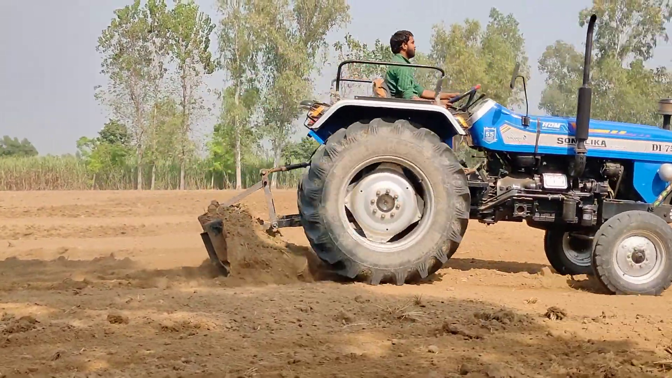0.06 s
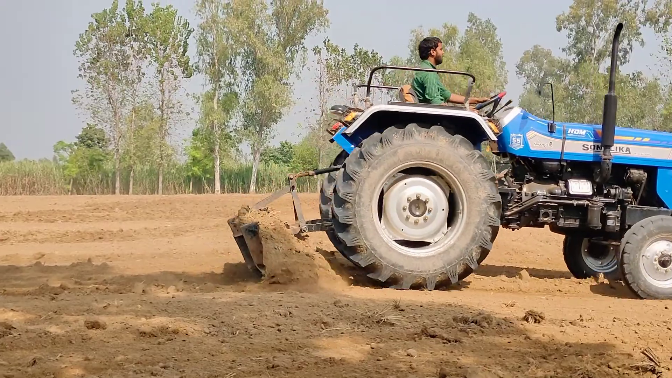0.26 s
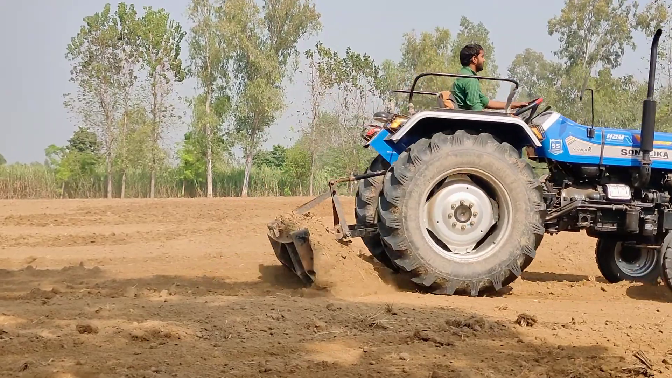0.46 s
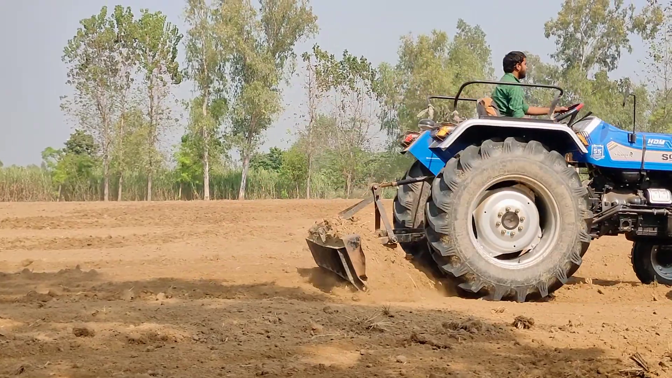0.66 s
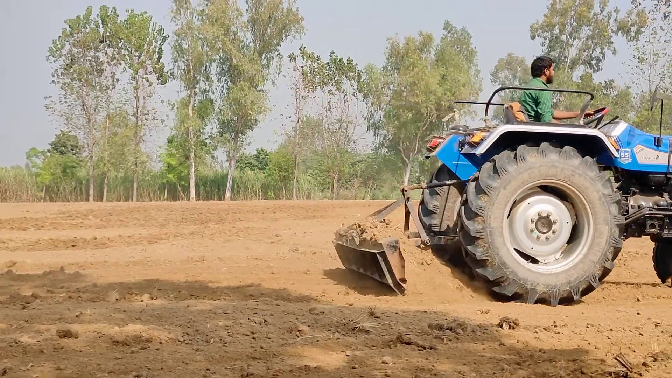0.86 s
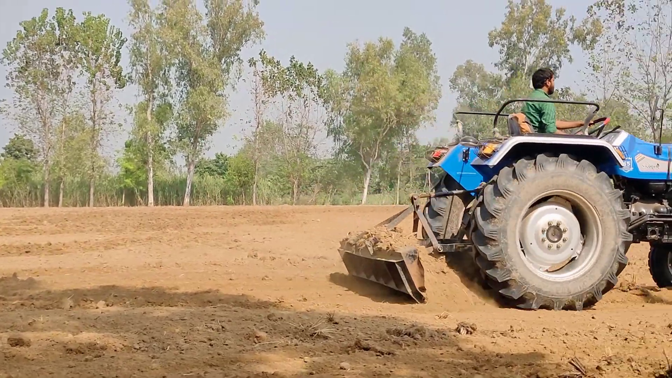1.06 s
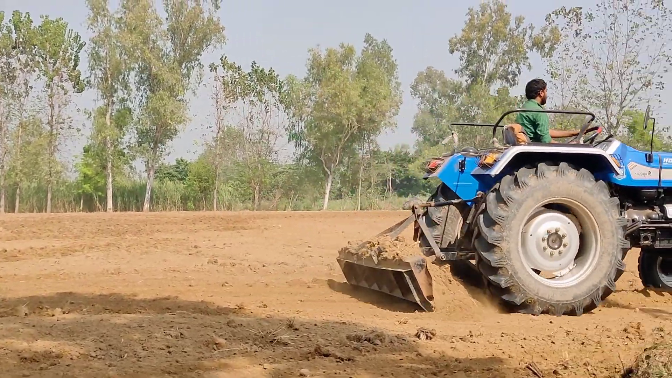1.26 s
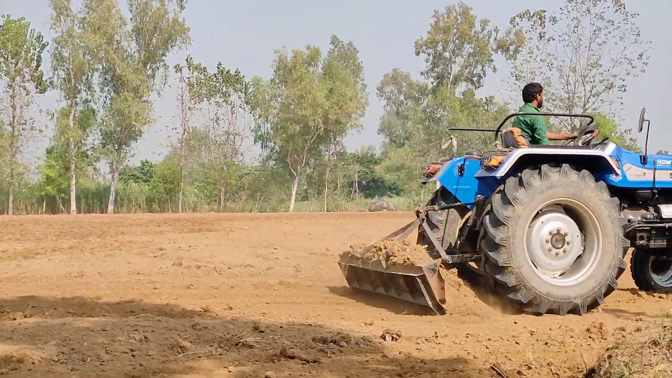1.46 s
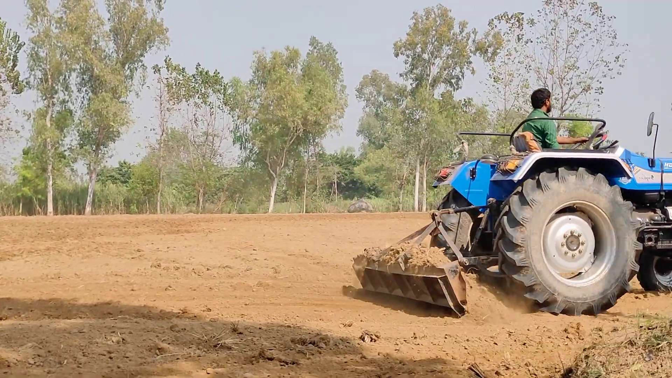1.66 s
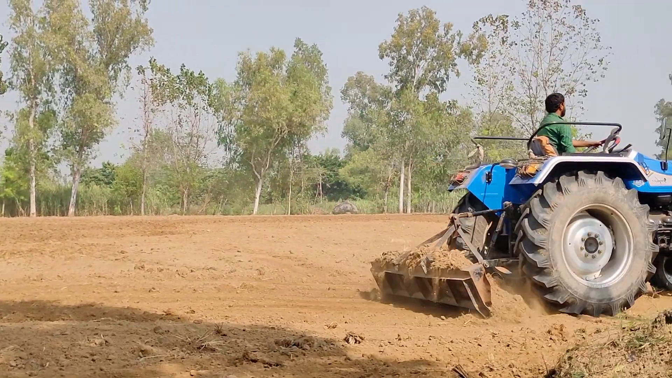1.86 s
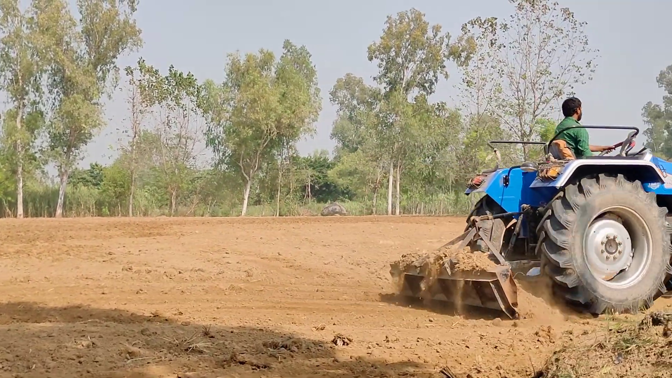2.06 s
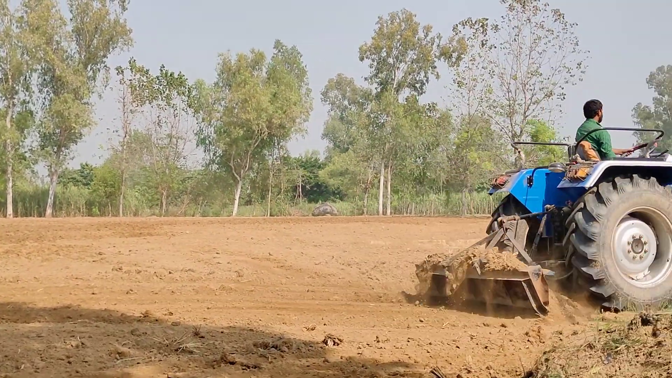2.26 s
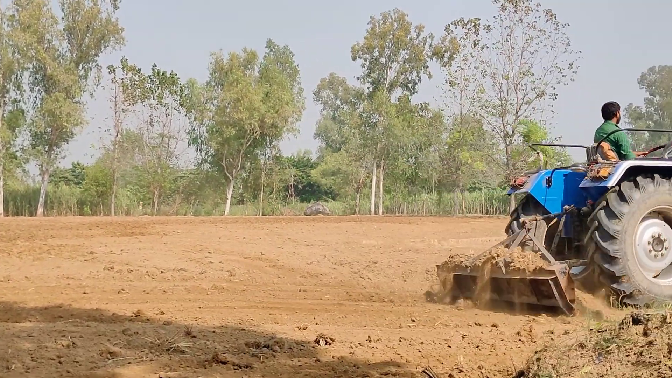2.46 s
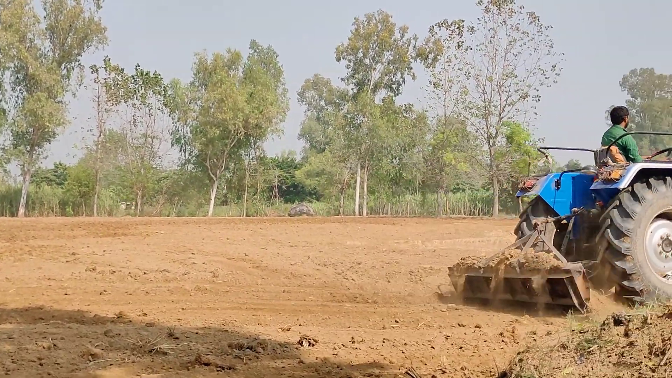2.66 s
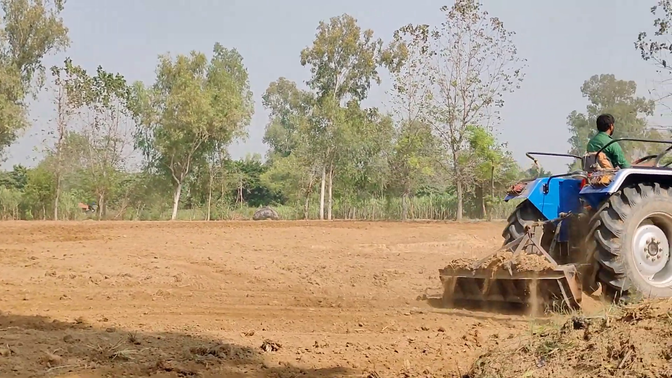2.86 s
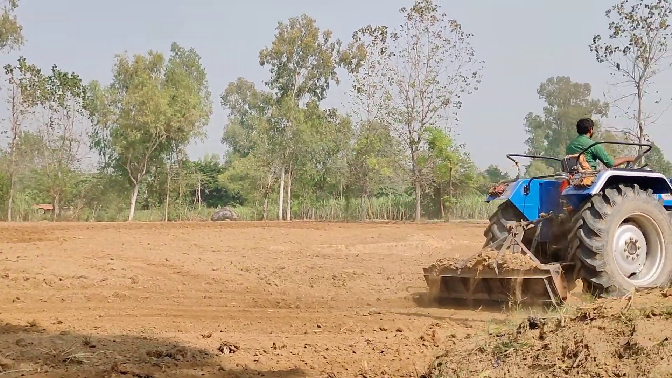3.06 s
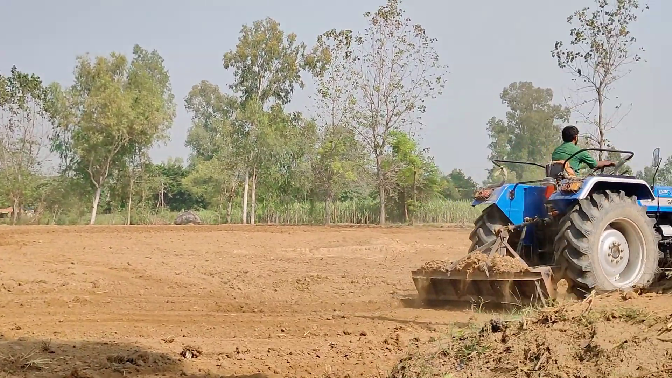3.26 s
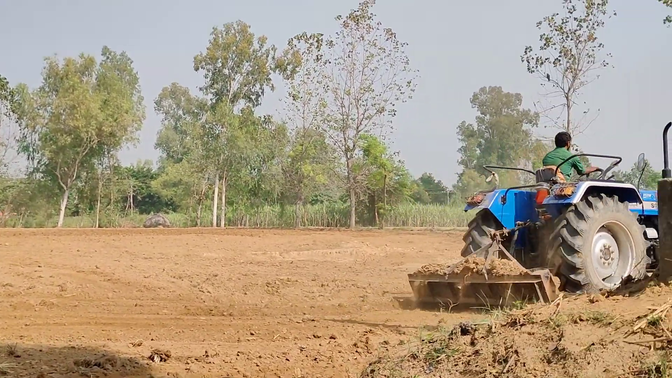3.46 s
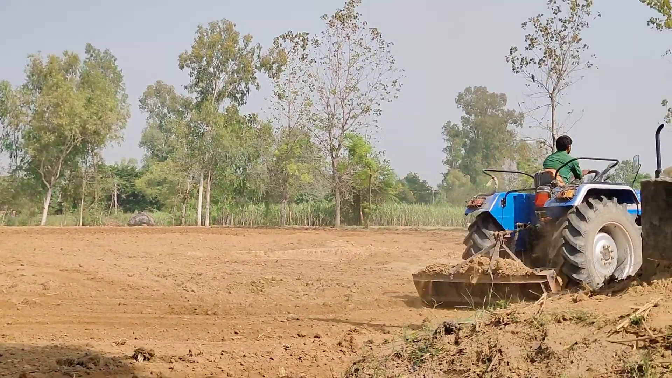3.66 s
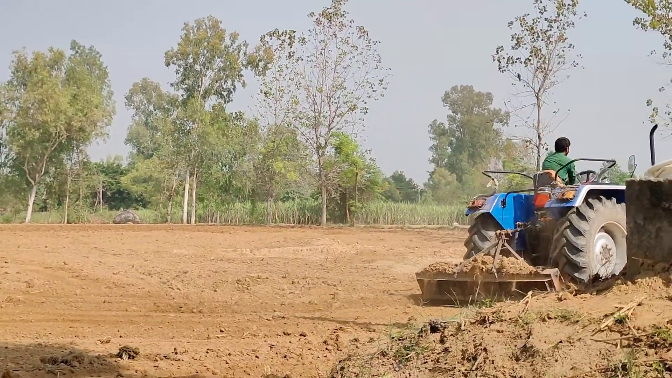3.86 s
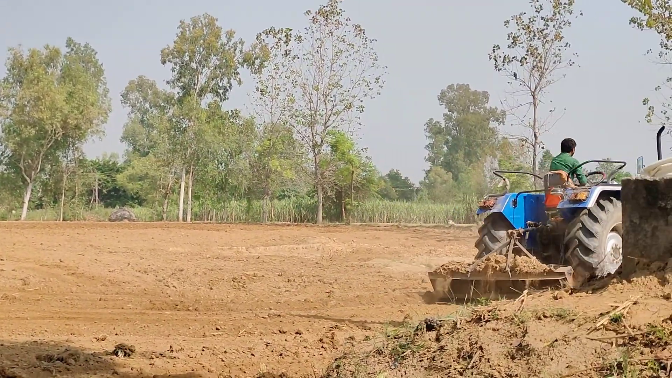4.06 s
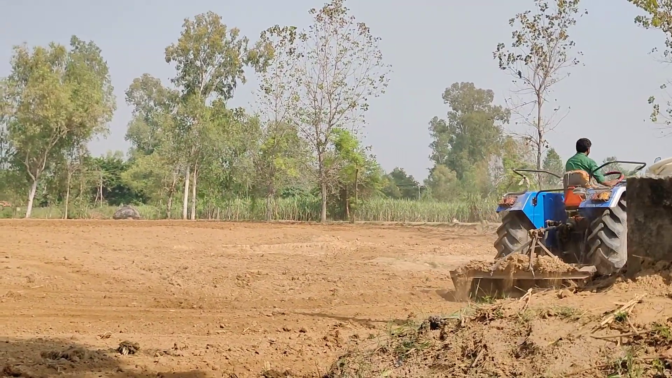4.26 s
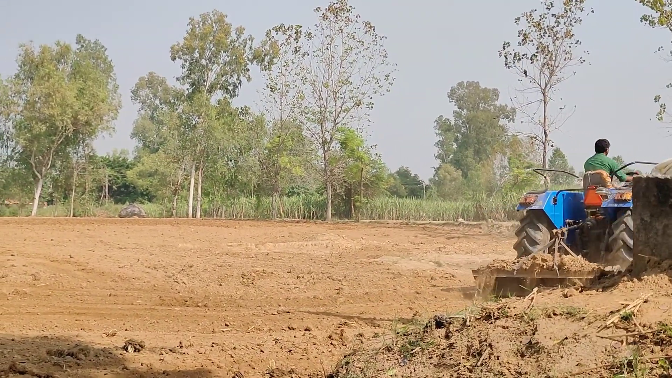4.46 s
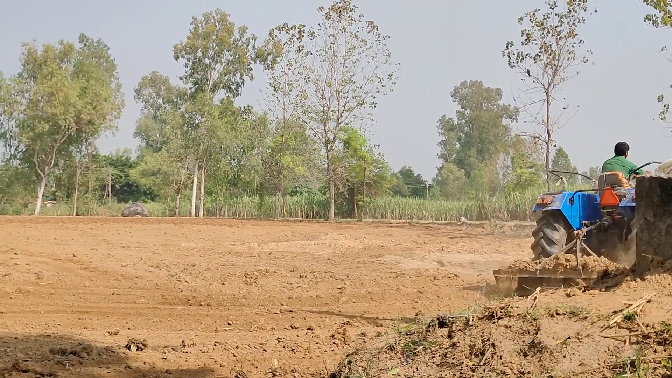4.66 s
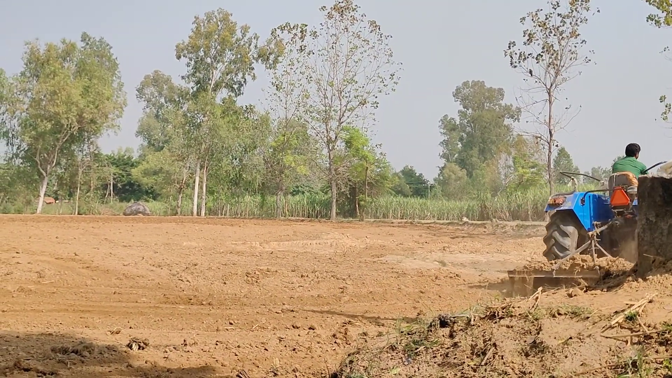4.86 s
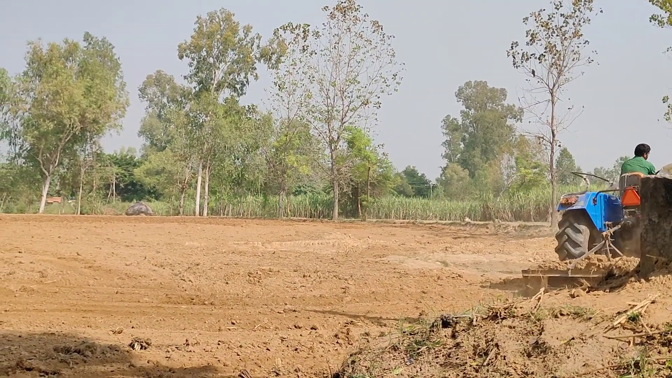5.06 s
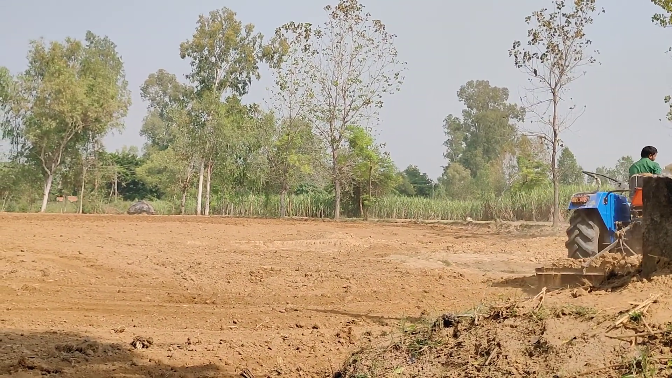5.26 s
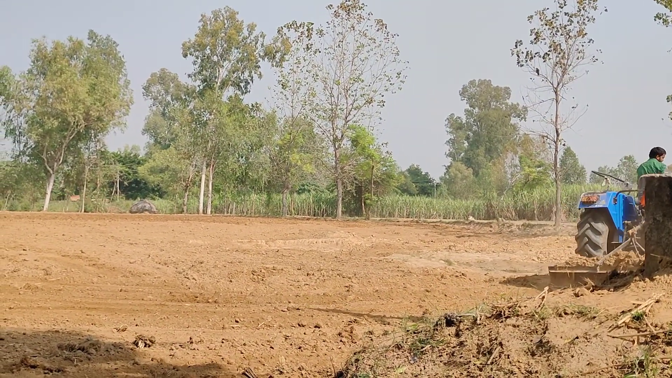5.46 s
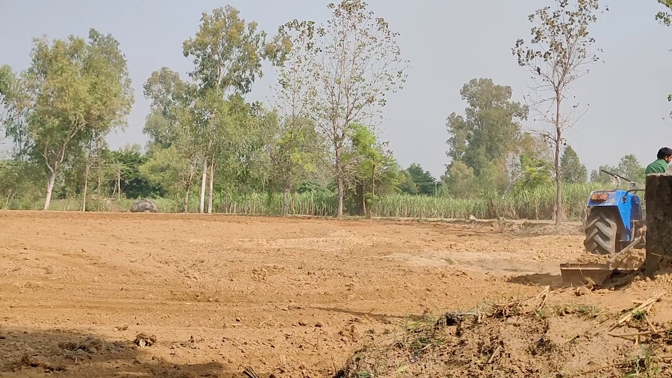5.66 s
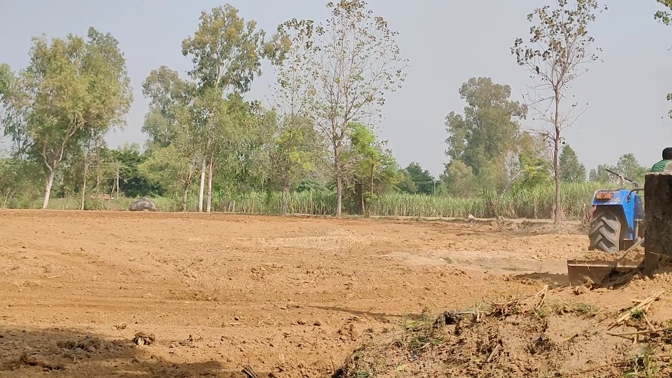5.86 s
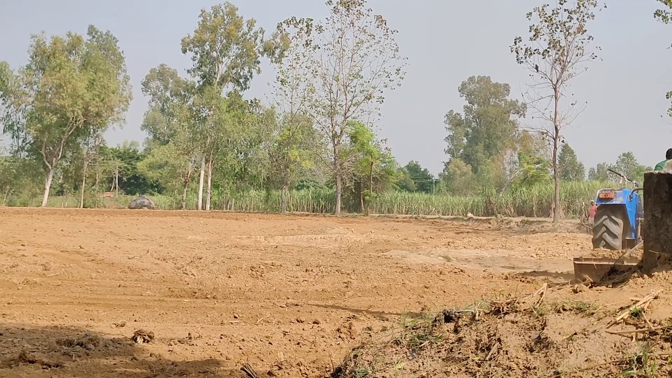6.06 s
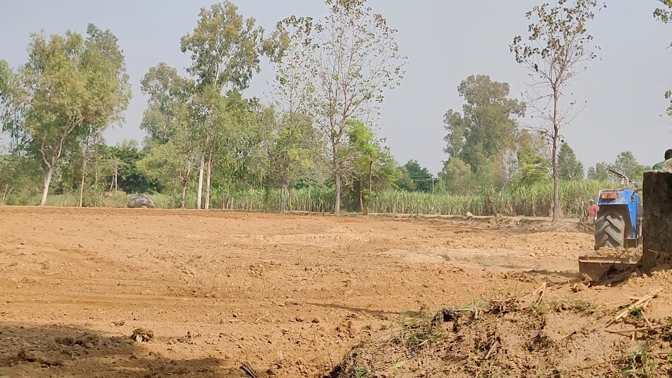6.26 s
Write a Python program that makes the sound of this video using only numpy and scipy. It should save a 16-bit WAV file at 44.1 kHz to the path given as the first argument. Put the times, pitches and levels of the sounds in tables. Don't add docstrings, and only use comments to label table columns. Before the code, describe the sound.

In an open dry field, a diesel tractor starts close to the microphone, beating fast and evenly at about thirty-five low thumps per second. Dense metallic clatter from the engine and gritty scraping of soil lie underneath, with lumpy wind and tyre rumble, gusting near 1 second. During the first second the exhaust hiss opens up, each firing spitting a raspy puff. Uneven firings pop out around 1.5 seconds. The engine works harder near 2.7 and again around 3.15 seconds, then the exhaust goes weak for a moment at 3.3 to 3.4. It recovers and lugs lower, straining at 4.2. From 4.9 to 5.1 a longer power cut softens it, and it resumes at a slower chug of about twenty-five beats per second. Hiss and clatter have thinned with distance, but the low throb stays strong until the end at 6.3 seconds.

```python
import sys
import numpy as np
from scipy import signal
from scipy.fft import rfft, irfft, next_fast_len
from scipy.io import wavfile
from scipy.ndimage import uniform_filter1d

SR = 44100
rng = np.random.default_rng(int(sys.argv[2]) if len(sys.argv) > 2 else 0)


def attenuation_scalar(level_db):
    decades = np.asarray(level_db, float) / 20
    return 10 ** decades


def digitize_waveform(pressure):
    field = np.atleast_2d(pressure).T
    bounded = np.clip(field, -1, 1)
    quanta = np.round(bounded * 32767).astype(np.int16)
    wavfile.write(sys.argv[1], SR, quanta)


N = 278271
T = np.arange(N) / SR
SIZE = next_fast_len(N)
HZ = np.fft.rfftfreq(SIZE, 1 / SR)

TURNED_S = 3.3
LEAVES_S = 5.66

# time in seconds, spit in dB, thump in dB.
ODD_FIRINGS = [(.68, -2, -5), (.996, 0, -2), (1.111, -6.5, 5), (1.4, -6.5, -2), (1.43, -5.5, -5),
               (1.518, 7, -3), (1.547, 7, 0), (1.576, 5, 3.5), (2.041, -2, -1), (2.511, 2.5, 1.5),
               (2.626, 4, 1), (2.682, 1.5, -1), (2.738, 1, 2), (2.794, 3.5, 2), (3.024, 1.5, 1),
               (3.168, 0.5, 2.5), (3.673, 4, 2.5), (3.85, -1.5, 3.5), (3.91, 2.5, -1), (4.159, 2.5, -1.5),
               (4.285, -1, 3.5), (4.349, -2.5, -4), (4.478, 3.5, -2.6), (4.679, 3.5, 2), (4.816, 3, -1),
               (5.091, 2, 0.5), (5.211, 4, -6), (5.331, 0.5, -5), (5.758, 2.5, 0.5), (6.153, 2, -7)]
# centre in Hz, width in Hz, change in dB.
ECHO_NOTCHES = [(603, 58, -5.5), (1430, 150, -1), (1980, 170, -1.5), (2810, 94, -10)]
# time in seconds, effort in dB.
ENGINE_EFFORT = [(0, 2), (.6, 2), (1.0, 0.5), (1.38, -1), (1.55, 0.5), (2.25, 2.5), (2.68, 6.5),
                 (2.93, 1.5), (3.15, 8), (3.6, 4), (3.85, -1), (4.2, 7.5), (4.62, -3), (4.8, 0), (5.16, 4),
                 (5.7, 1), (5.9, 1.5), (6.31, -1)]


def evened(x):
    return x / np.sqrt(np.mean(x ** 2) + 1e-20)


def curve(rows, axis=1):
    columns = np.transpose(rows)
    return np.interp(T, columns[0], columns[axis])


def filtered(x, gain):
    return irfft(rfft(x, SIZE) * gain, SIZE)[..., :N]


def colour(x, points, rings=()):
    f, db = np.transpose(points)
    shape_db = np.interp(np.log(HZ + 1), np.log(f + 1), db)
    for hz, width, ring_db in rings:
        shape_db = shape_db + ring_db / (1 + (2 * (HZ - hz) / width) ** 2)
    return evened(filtered(x, attenuation_scalar(shape_db)))


def resonate(x, hz, width):
    turn = np.exp(2j * np.pi * np.cumsum(hz) / SR)
    r = np.exp(-2 * np.pi * width / SR)
    smooth = signal.lfilter([1], [1, -2 * r, r * r], x / turn)
    return evened((turn * smooth).real)


def flicker(hz, db):
    knots = rng.standard_normal(4000)
    wander = np.interp(T * 2 * hz, np.arange(len(knots)), knots)
    return attenuation_scalar(db * evened(uniform_filter1d(wander, size=64)))


def span(start, end, fade):
    opening = 1 + np.tanh((T - start) / fade / 2)
    closing = 1 - np.tanh((T - end) / 0.014 / 2)
    return opening * closing / 4


def fuel_cut():
    # start in seconds, end in seconds, fading time in seconds, effort lost in dB.
    cuts = [
        (3.323, 3.442, 0.013, -10.5),
        (4.894, 5.088, 0.027, -10.5),
    ]
    return sum(db * span(start, end, fade) for start, end, fade, db in cuts)


def turned_away():
    return 1 - np.exp(-T / TURNED_S)


def hidden():
    faces_s = 0.85
    return np.exp(-(T / faces_s) ** 4)


def level(law, extra_db=0):
    near_db, loss_db, effort_share, cut_share = law
    distance_db = near_db + loss_db * np.minimum(T, LEAVES_S)
    engine_db = effort_share * curve(ENGINE_EFFORT) + cut_share * fuel_cut()
    return attenuation_scalar(distance_db + engine_db + extra_db)


def exhaust(turns, rate, luck):
    # frequency in Hz, level nearby in dB, loss in dB per second of driving off.
    pipe = [(25, -53, -2.2), (34, -40, -1.1), (50, -47.5, 0.5), (68.6, -41.5, -0.6), (100, -39.5, -1.6),
            (123, -45, -2), (183, -41, -5.5), (199.3, -46.5, -3.5)]
    # level nearby in dB, loss in dB per second of driving off, share of effort, share of a fuel cut.
    thump_law = (0.11, 0.01, 0.19, 0.77)
    lugging_db = [2.5, -2.5, 3, -3, -6, 0]
    lugging = span(3.5, 4.98, .1)
    f, near_db, loss_db = np.transpose(pipe)
    out = np.zeros(N)
    for order in range(1, 7):
        hz = order * rate
        centre, width = np.where(hz < 122, [[72], [105]], [[182], [75]])
        lead = uniform_filter1d(-2 * np.arctan((hz - centre) / width), size=4000)
        lead = lead + order * np.log(flicker(9, 0.59))
        level_db = np.interp(hz, f, near_db) + np.interp(hz, f, loss_db) * np.minimum(T, LEAVES_S)
        level_db = level_db + lugging_db[order - 1] * lugging
        strength = np.sqrt(2) * attenuation_scalar(level_db) * flicker(12, 1.6 + .15 * order)
        out -= strength * np.cos(2 * np.pi * order * turns + lead)
    burn_db = .9 * luck[:, 0]
    s, _, thump_db = np.transpose(ODD_FIRINGS)
    odd = np.round(turns[(s * SR).astype(int)]).astype(int)
    burn_db[odd] = thump_db
    return out * level(thump_law) * attenuation_scalar(np.interp(turns, np.arange(len(luck)) + .1, burn_db))


def puffs(turns, rate, luck):
    rise_s, fall_s, spread_db = 0.0017, 0.0089, 1.0
    nearest = np.floor(turns + .5).astype(int)
    since = (turns - nearest + .2) / rate + .0007 * luck[nearest, 1]
    shape = np.exp(-np.maximum(since, 0) / fall_s) / (1 + np.exp(-since / rise_s * 2))
    size_db = spread_db * luck[:, 2]
    s, spit_db, _ = np.transpose(ODD_FIRINGS)
    size_db[nearest[(s * SR).astype(int)]] = 1.06 * spit_db
    return evened(uniform_filter1d(attenuation_scalar(size_db[nearest]) * shape, size=60))


def jet(flow, turns, luck):
    # frequency in Hz, level in dB per Hz.
    hiss_shape = [(150, -35.5), (250, -11), (452, -12.5), (608, -6), (674, -2), (842, -11.5), (1130, -5.5),
                  (1370, -27.5), (1640, -19.5), (2790, -14), (3140, -9), (4900, 0), (6300, -15.5),
                  (7530, -17.5), (8600, -52), (11200, -89), (18900, -120)]
    # centre in Hz, width in Hz, level in dB.
    stack_rings = [(1053, 48, -20), (1572, 68, -18), (3208, 68, -9), (3576, 130, -8.5), (3866, 95, -4),
                   (4168, 90, -5.5), (4450, 60, -16.5), (4712, 84, -3), (5022, 48, -8), (5427, 180, -13),
                   (6640, 69, -32.5), (7540, 230, -22.5)]
    # level nearby in dB, loss in dB per second of driving off, share of effort, share of a fuel cut.
    jet_law = (-37, -2.5, 1, 1.05)
    favour_db, hidden_db = 4.5, -16.5
    effort_db = curve(ENGINE_EFFORT) + 2 * fuel_cut()
    leak = np.clip((0.47 - 0.02 * effort_db) * (1 - hidden()), 0, 1)
    away = turned_away()
    gate = np.sqrt(leak + (1 - leak) * flow ** 2)
    hiss = colour(gate * rng.standard_normal(N), hiss_shape, ECHO_NOTCHES)
    nearest = np.floor(turns + .5).astype(int)
    for k, (hz, width, db) in enumerate(stack_rings):
        puff = flow * attenuation_scalar(favour_db * luck[nearest, k + 3])
        drive = np.sqrt(.5 * leak + (1 - leak) * puff ** 2) * rng.standard_normal(N)
        bright_db = 6.5 * (away - .6) * np.clip(hz / 1000 - 4.4, 0, 1)
        pitch = hz * flicker(1.2, 0.12)
        hiss = hiss + attenuation_scalar(db + bright_db) * resonate(drive, pitch, width)
    return level(jet_law, hidden_db * hidden()) * evened(hiss)


def fizz(flow):
    # frequency in Hz, level in dB per Hz.
    fizz_shape = [(4500, -25.5), (5800, -6.5), (6600, -7.5), (7000, 1.5), (7400, 12.5), (7750, 1),
                  (8100, -7), (8600, -38.5)]
    # level nearby in dB, loss in dB per second of driving off, share of effort, share of a fuel cut.
    fizz_law = (-55.5, -4.5, 0.36, 0.3)
    leak, hidden_db = 0.076, -3
    gate = np.sqrt(leak + flow ** 2) * flicker(60, 0.99)
    spray = colour(gate * rng.standard_normal(N), fizz_shape)
    return level(fizz_law, hidden_db * np.exp(-(T / TURNED_S) ** 2)) * spray


def block(flow):
    # frequency in Hz, level in dB per Hz.
    clatter_shape = [(140, -21), (230, 1.5), (248, -3.5), (336, -10), (415, -4), (607, -9), (706, -4.5),
                     (1220, -6.5), (1550, -6), (1730, -3.5), (2720, -12), (4090, -9.5), (5300, -16.5),
                     (7500, -23), (8600, -68), (11200, -108), (18900, -120)]
    # Hz when near, Hz when far, width in Hz, dB when near, dB when far.
    casting_rings = [(420.3, 405, 10, -20, -14.5), (714, 754, 170, -36, -4), (1162, 1038, 77, -10.5, -12),
                     (1259, 1200, 20, -12.5, -27.5), (1326, 1300, 34, -6, -27.5),
                     (1731, 1630, 59, -8, -13.5), (2156, 2080, 100, -9.5, -26), (3534, 3200, 330, -2, -19),
                     (4150, 3700, 190, -4, -19.5)]
    # level nearby in dB, loss in dB per second of driving off, share of effort, share of a fuel cut.
    block_law = (-40.5, -2.5, 0.19, 0.5)
    away = turned_away()
    knock = np.clip(0.23 + 0.15 * away, 0, 1)
    gate = np.sqrt(1 - knock + knock * flow ** 2) * flicker(55, 0.95)
    ticks = rng.standard_normal(N) * attenuation_scalar(1.5 * np.minimum(rng.exponential(1, N), 4))
    out = colour(gate * ticks, clatter_shape, ECHO_NOTCHES)
    for near_hz, far_hz, width, near_db, far_db in casting_rings:
        rattle = gate * flicker(30, 1.5) * rng.standard_normal(N)
        hz = near_hz + away * (far_hz - near_hz)
        ring_db = near_db + away * (far_db - near_db)
        out = out + attenuation_scalar(ring_db) * resonate(rattle, hz, width)
    return level(block_law) * out


def rumble():
    # frequency in Hz, level in dB per Hz.
    rumble_shape = [(10, -6), (22, -1), (60, 0), (110, 0), (170, -5), (225, -12), (300, -24), (500, -45)]
    # middle in seconds, half length in seconds, change in dB.
    gusts = [
        (0.142, 0.044, -1.5),
        (1.05, 0.12, 3.5),
        (1.7, 0.17, -1.5),
        (3.246, .1, 1.5),
    ]
    # level nearby in dB, loss in dB per second of driving off, share of effort, share of a fuel cut.
    rumble_law = (-43.5, -2, 0.32, -0.3)
    gust_db = sum(db * np.exp(-((T - s) / half) ** 2) for s, half, db in gusts)
    noise = colour(rng.standard_normal(N), rumble_shape)
    return level(rumble_law, gust_db) * flicker(4, 2.) * noise


def scene():
    # time in seconds, engine speed in firings per second.
    engine_speed = [(0.0, 34.97), (0.54, 35.25), (1.56, 34.18), (1.64, 34.6), (2.42, 33.87), (2.76, 35.93),
                    (3.04, 33.98), (3.26, 36.0), (3.42, 31.6), (3.7, 34.56), (3.96, 32.26), (4.42, 31.22),
                    (4.68, 28.87), (4.98, 30.36), (5.12, 24.38), (5.44, 26.18), (5.78, 25.2), (6.31, 25.56)]
    rate = curve(engine_speed)
    turns = .08 + np.cumsum(rate) / SR
    luck = np.clip(rng.standard_normal((300, 16)), -2, 2)
    flow = puffs(turns, rate, luck)
    engine = exhaust(turns, rate, luck) + jet(flow, turns, luck) + fizz(flow) + block(flow)
    return (engine + rumble())[None]


def top_cut(x):
    return signal.sosfilt(signal.butter(12, 8820, fs=SR, output="sos"), x)


def record(dry):
    top_hz = 8300
    mix = filtered(dry, 1 / np.sqrt(1 + (HZ / top_hz) ** 90))
    return top_cut(mix)


dry = scene()
out = record(dry)
digitize_waveform(out)
```